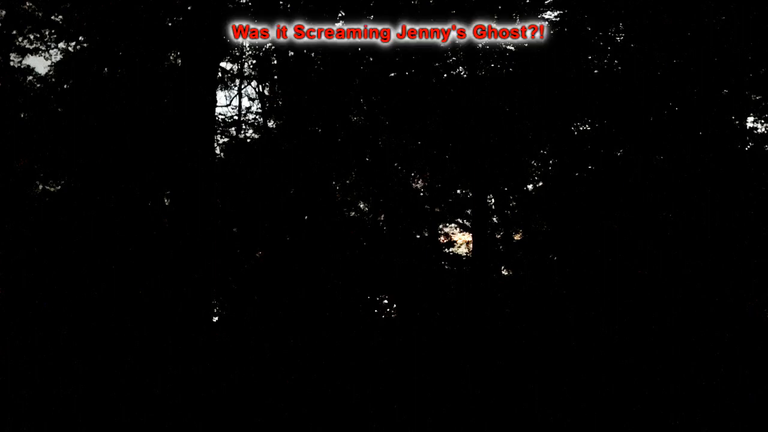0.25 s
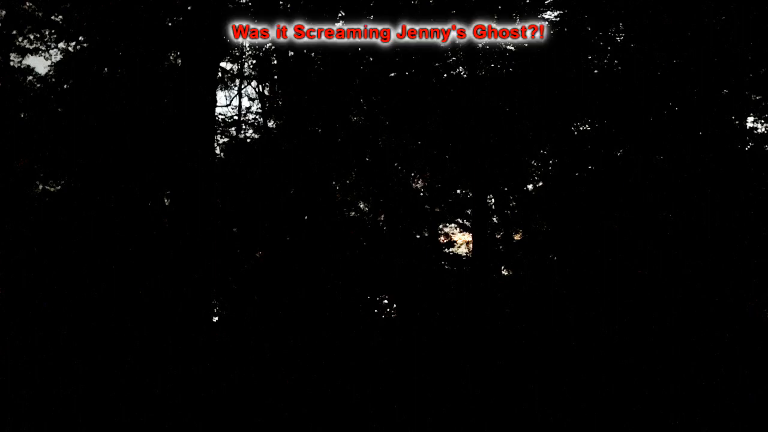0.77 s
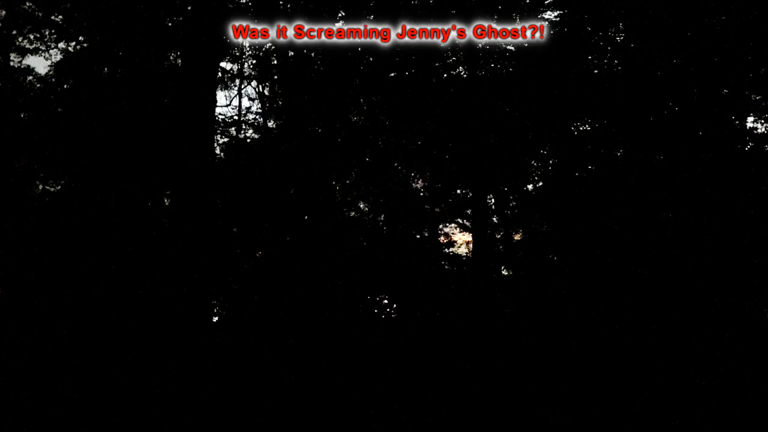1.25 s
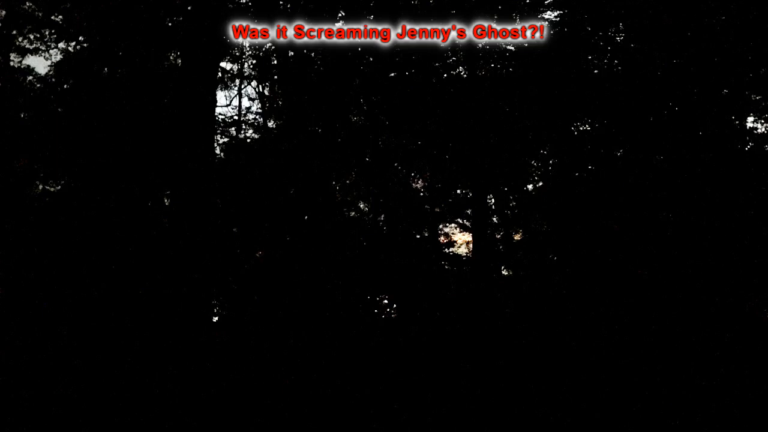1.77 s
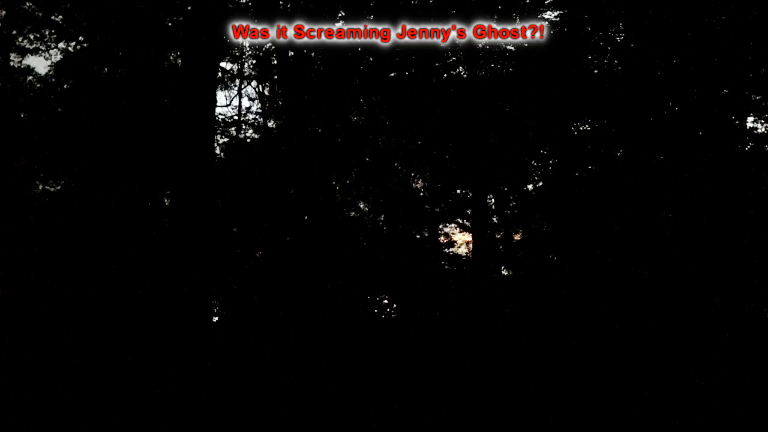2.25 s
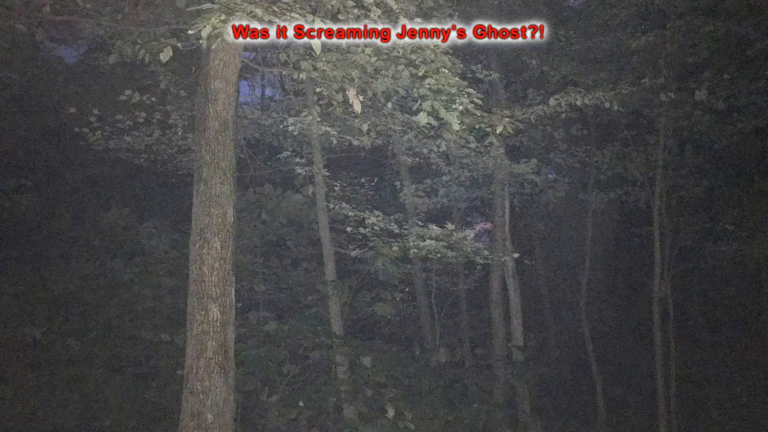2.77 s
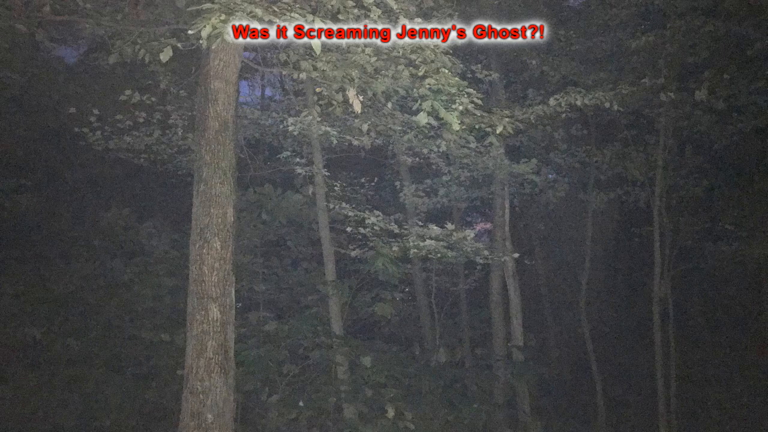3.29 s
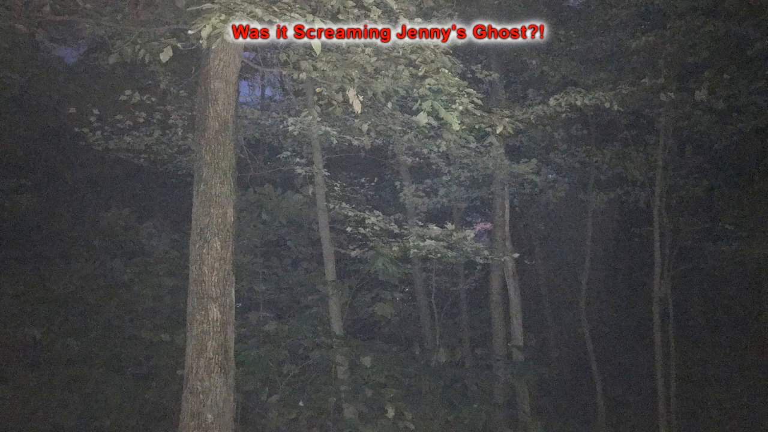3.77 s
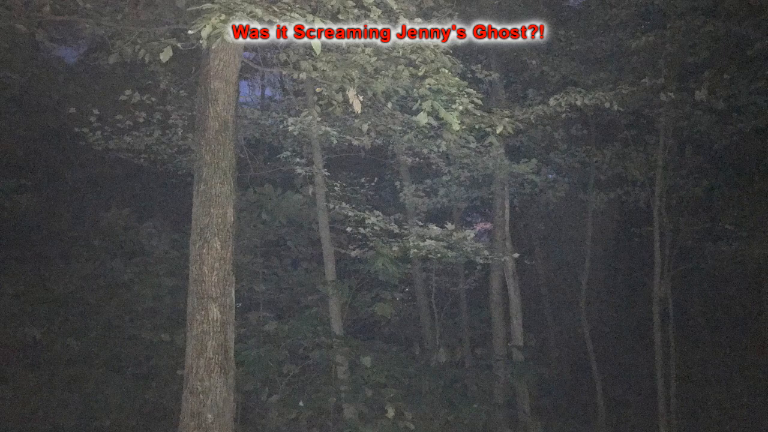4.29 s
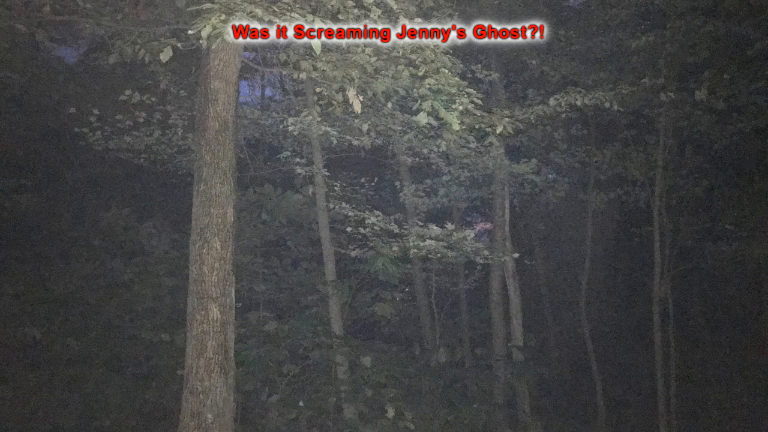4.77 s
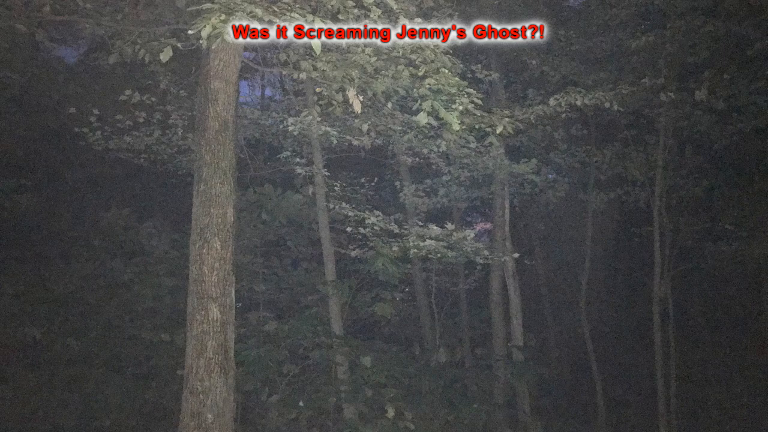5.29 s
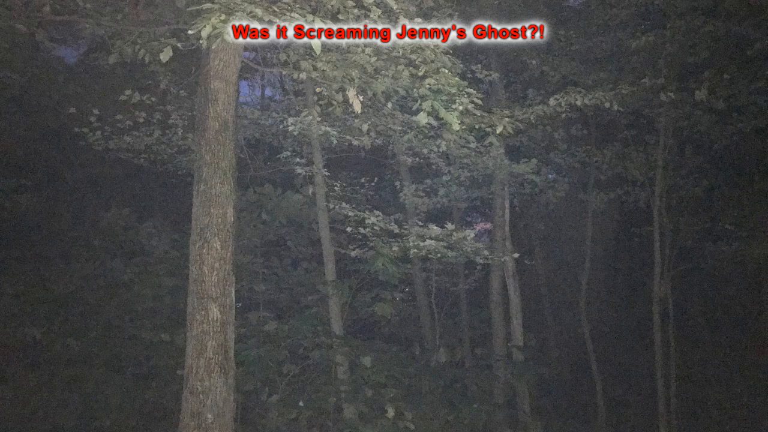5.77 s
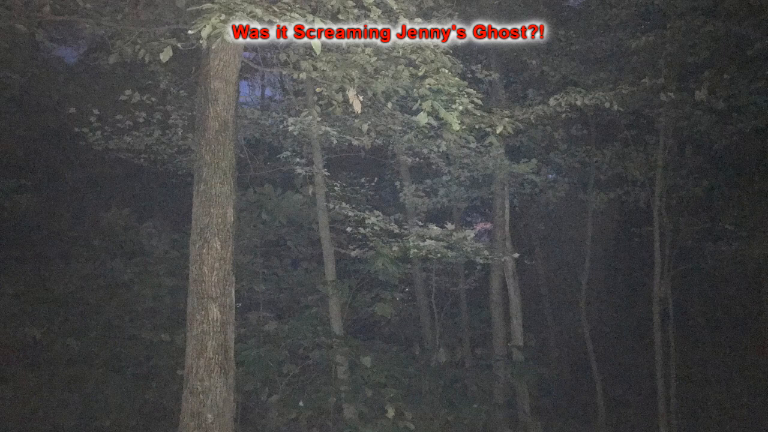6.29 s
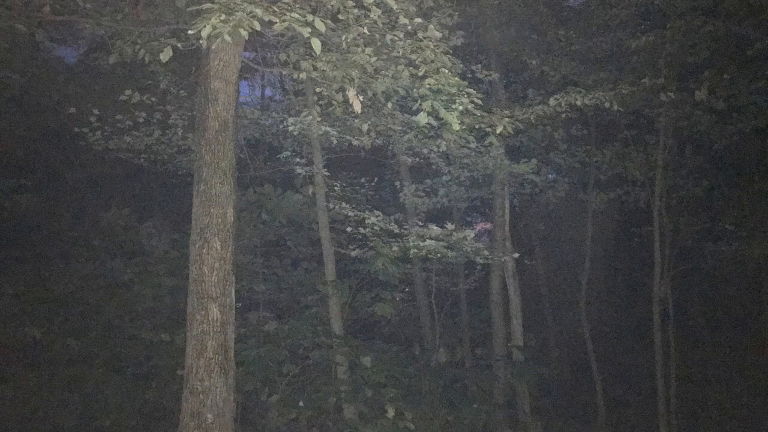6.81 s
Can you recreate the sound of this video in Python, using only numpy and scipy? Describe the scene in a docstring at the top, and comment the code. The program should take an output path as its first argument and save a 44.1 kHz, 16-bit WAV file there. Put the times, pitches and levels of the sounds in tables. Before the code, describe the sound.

Crickets trill steadily throughout in a wood at night, with a high sizzle and occasional hoarse chirrs from farther insects. Beneath them lie a soft hiss of air and a low, distant rumble that swells gently three times. Right at the start a screech owl whinnies for about a second: a nearly pure whistle that slides up, grows louder, quavers and sinks, echoing among the trunks. At about 1.7 seconds something small snaps sharply close by. Two nearer crickets fade out by around 3 to 3.5 seconds. The owl calls again from 3.2 to 4.4 seconds, swelling as it falls with a gentler quaver. From 5.5 to 6.2 seconds a katydid makes five quick, dry, high rasps while the chorus briefly surges. At 6.6 seconds a third, softer owl call begins, cracking into a higher second tone near the end at about 7 seconds.

```python
"""A screech owl whinnies three times in a wood at night: its voice box makes a nearly pure whistle
that rises, quavers and sinks, then rings on among the trunks. Crickets trill all round by rubbing
their wings together, a katydid (a large bush cricket) rasps five times the same way, and something
small snaps close by. Under it all lie a soft hiss of air and a low, distant rumble."""
import sys
import numpy as np
from scipy import signal
from scipy.fft import rfft, irfft, next_fast_len
from scipy.io import wavfile

SR = 44100
rng = np.random.default_rng(int(sys.argv[2]) if len(sys.argv) > 2 else 0)


def master(y):
    """Save y as 16-bit WAV."""
    cut = np.clip(np.atleast_2d(y).T, -1, 1)
    pcm = np.round(cut * 32767)  # scale
    wavfile.write(sys.argv[1], SR, pcm.astype(np.int16))


N = 310905
T = np.arange(N) / SR  # the time of each sample, in seconds


def undb(db):
    """Turn decibels (dB) into a number to multiply a sound by."""
    return 10 ** (np.asarray(db) / 20)


def unit(x):
    """Scale a signal so that its average strength (rms) is 1."""
    return x / np.sqrt(np.mean(x ** 2))


def gate(start, end, edge):
    """Fade in after start and out before end; each fade lasts edge seconds."""
    return np.clip((T - start) / edge, 0, 1) * np.clip((end - T) / edge, 0, 1)


def bump(middle, half):
    """A smooth rise to 1 and back, strongest within half seconds of the middle."""
    return np.exp(-((T - middle) / half) ** 2)


def wobble(rate):
    """A smooth random wobble, about 1 in size, that changes about rate times a second."""
    hz = np.arange(N // 2 + 1) * SR / N
    keep_slow = np.exp(-(hz / rate) ** 2) * (hz > 0)
    return unit(irfft(rfft(rng.standard_normal(N)) * keep_slow, N))


def colour(x, points):
    """Turn frequencies up or down by rows of (Hz, dB), then scale the sound to strength 1."""
    hz, db = np.transpose(points)
    size = next_fast_len(N)
    bins = np.maximum(np.arange(size // 2 + 1) * SR / size, 1)
    gain = undb(np.interp(np.log(bins), np.log(hz), db))
    return unit(irfft(rfft(x, size) * gain, size)[:N])


def trees(x, fade_s, build_s):
    """Countless echoes off trunks and leaves build up, then die away by 60 dB in fade_s seconds."""
    t = T[:2 * SR]
    echoes = rng.standard_normal(len(t)) * undb(-60 * t / fade_s) * (1 - np.exp(-t / build_s))
    return signal.fftconvolve(x, echoes / np.sqrt(np.sum(echoes ** 2)))[:N]


def night_air(level_db=-37):
    """Still air: a soft, steady hiss, strongest in the bass."""
    # Each row: frequency in Hz, relative level in dB.
    air_colour = [(15, -4), (30, -3.5), (100, -1), (160, -7.5), (270, -11), (450, -18), (620, -17.5),
                  (800, -20.5), (980, -20.5), (1500, -26.5), (4000, -29), (12000, -42.5)]
    return colour(rng.standard_normal(N), air_colour) * undb(level_db)


def distant_rumble(boom_db=-32.5, hum_hz=65.95, hum_db=-32.5, hum_fade_db_per_s=0.6):
    """A deep noise swells three times, with a wavering hum in it that slowly fades."""
    # Each row: frequency in Hz, relative level in dB.
    boom_colour = [(18, -25), (30, -6), (45, 0), (63, 2.5), (80, -7), (105, -8), (160, -22), (400, -56),
                   (1000, -88)]
    # Each row: middle in seconds, half length in seconds, boost of the boom in dB, of the hum in dB.
    swells = [(.75, 0.46, 3, 3.5), (3.2, 0.68, 2, 6.5), (5.8, .28, 3, 4)]
    boom_swell_db, hum_swell_db = sum(np.outer(dbs, bump(middle, half)) for middle, half, *dbs in swells)
    boom = colour(rng.standard_normal(N), boom_colour) * undb(boom_db + boom_swell_db)
    hum_gain = undb(hum_db + hum_swell_db - hum_fade_db_per_s * T + 0.83 * wobble(12))
    hum = hum_gain * np.sin(2 * np.pi * np.cumsum(hum_hz + 2.475 * wobble(6.35)) / SR)
    return (boom + hum) * undb(0.5 * wobble(1.6))


def insect_wave(period_s=2.1, crest_s=0.31):
    """The slow swell and ebb that the chorus and the sizzle share, from -1 to 1."""
    return np.cos(2 * np.pi * (T - crest_s) / period_s)


def far_insects(drone_db=-49, sizzle_db=-45.5, chirr_gap_s=0.24):
    """Far insects blend into a low drone, hoarse chirrs and the high sizzle of many bush crickets."""
    # In these three tables, each row: frequency in Hz, relative level in dB.
    drone_colour = [(1600, -26), (1900, -5), (2080, 0), (2250, -7.5), (2600, -14.5), (3000, -2),
                    (3300, -61)]
    chirr_colour = [(1600, -11.5), (1950, 5.5), (2100, 1), (2350, 2), (2600, 2), (2950, 4.5), (3300, -53)]
    sizzle_colour = [(3500, -25), (4700, -1.5), (5300, 5), (6050, -7.5), (6900, 3.5), (7600, -1), (8300, 2),
                     (9200, -9), (10000, 0), (10900, -4.5), (13500, -6.5)]
    # Each row: middle of the first chirr in seconds, half length in seconds, level in dB, chirr count.
    chirr_groups = [(0.098, 0.12, -44.5, 2), (2.35, .088, -46.5, 2), (3.5, .15, -51.5, 2),
                    (4.478, 0.092, -44.5, 2), (5.029, .16, -42.3, 1), (6.41, 0.083, -45.5, 2)]
    drone = colour(rng.standard_normal(N), drone_colour) * undb(drone_db + wobble(24))
    waves = sum(undb(db) * bump(first + k * chirr_gap_s, half)
                for first, half, db, count in chirr_groups for k in range(round(count)))
    chirr = colour(rng.standard_normal(N), chirr_colour) * waves * undb(wobble(40))
    sizzle = colour(rng.standard_normal(N), sizzle_colour)
    sizzle *= undb(sizzle_db + 0.7 * insect_wave() + 0.83 * wobble(45))
    return drone + chirr + sizzle


def bush_cricket():
    """One bush cricket makes a thin, very high buzz that comes and goes."""
    # Each row: frequency in Hz, relative level in dB.
    buzz_colour = [(8500, -40), (9700, -2), (10050, -7), (10400, -10), (12000, -40)]
    # Each row: start in seconds, end in seconds, level in dB.
    buzzes = [(0, 0.497, -59), (2.15, 2.75, -54.5), (4.1, 4.799, -58)]
    loudness = sum(undb(db) * gate(start, end, 0.11) for start, end, db in buzzes)
    return colour(rng.standard_normal(N), buzz_colour) * loudness


def cricket(hz, strokes_per_s, sag, wander, scatter, overlap):
    """Each wing stroke draws a row of tiny teeth over a scraper: a short tone that sags in pitch."""
    drift = np.interp(T, np.linspace(0, T[-1], num=16), rng.standard_normal(size=16))
    speed = strokes_per_s * (1 + wander * drift)
    number, progress = np.divmod(rng.random() + np.cumsum(speed) / SR, 1)
    # every stroke gets its own pitch and size; more overlap runs the strokes together
    detune, size = rng.standard_normal(size=(1024, 2))[number.astype(int)].T
    stroke = np.maximum(overlap - np.cos(2 * np.pi * progress), 0) * undb(2 * size)
    pitch = hz * (1 - sag * (progress - .5) + scatter * detune)
    return unit(stroke * np.sin(2 * np.pi * np.cumsum(pitch) / SR))


def cricket_chorus(count=28, level_db=-28, blur_db=-4, surge_db=1.8):
    """Many crickets, each at its own pitch and speed; the furthest blur into a hiss."""
    # Each row: frequency in Hz, relative level in dB.
    chorus_colour = [(1500, -85), (2750, -34), (3020, -18), (3200, -7), (3350, 1.5), (3530, -0.5),
                     (3720, -5), (3930, -12.5), (4150, -10.5), (4400, -17.5), (4700, -26), (6500, -92)]
    singers = sum(cricket(hz, rng.uniform(42, 62), sag=0.06, wander=.02, scatter=.007, overlap=0.34)
                  for hz in np.linspace(3050, 4400, count))
    blur = undb(blur_db) * colour(rng.standard_normal(N), chorus_colour)
    loudness = undb(level_db + 0.52 * insect_wave() + surge_db * bump(middle=5.7, half=0.25))
    return unit(colour(singers, chorus_colour) + blur) * loudness


def near_crickets(echo_db=-4):
    """Two nearby crickets stand out from the chorus, then stop."""
    # Each row: start in seconds, end in seconds, pitch in Hz, wing strokes per second, level in dB.
    trills = [(0.016, 3.5, 2005, 37.3, -52), (-0.18, 2.95, 4050, 45.2, -41)]
    direct = np.zeros(N)
    for start, end, hz, strokes_per_s, db in trills:
        trill = cricket(hz, strokes_per_s, sag=0.017, wander=0.007, scatter=0.01103, overlap=0.76)
        direct += undb(db) * gate(start, end, 0.49) * trill
    return direct + undb(echo_db) * trees(direct, fade_s=0.29, build_s=0.0072)


def katydid(start_s=5.544, count=5, period_s=0.1296, scrape_s=.122, level_db=-42.5, echo_db=-0.5):
    """Dry, evenly paced scrapes of the wings, one close behind another."""
    # Each row: frequency in Hz, relative level in dB.
    scrape_colour = [(5000, -40), (6000, -10), (6800, 1), (8000, 5.5), (10000, 3.5), (12000, -1.5),
                     (13800, -2), (15000, -22)]
    scrapes = sum(gate(at, at + scrape_s, 0.036) for at in start_s + period_s * np.arange(count))
    rasp = rng.standard_normal(N) * undb(0.5 * wobble(400))
    direct = undb(level_db) * scrapes * colour(rasp, scrape_colour)
    return direct + undb(echo_db) * trees(direct, fade_s=0.65, build_s=0.012)


def snap(crack_db=-15, crack_fade_s=0.019, echo_db=-18, bass_cut_hz=1450):
    """A small hard thing clicks and rebounds, ringing for a few thousandths of a second."""
    # Each row: start in seconds, relative level in dB, treble boost of the ring in dB per octave.
    clicks = [(1.689, -.4, -1.5), (1.695, -21.5, 8)]
    # Each row: pitch of a ringing tone in Hz, relative level in dB, seconds to fade by 60 dB.
    tones = [(1396, -44, 0.0086), (2580, -8, 0.0058), (3240, 2, 0.006), (4320, -12, 0.0085),
             (6960, -8.5, 0.0037), (8070, -1.5, 0.0027), (13300, -15, 0.0023)]
    direct = np.zeros(N)
    for start, size_db, tilt_db in clicks:
        age = np.maximum(T - start, 0)
        ring = sum(undb(db + tilt_db * np.log2(hz / 3300) - 60 * age / fade_s)
                   * np.sin(2 * np.pi * hz * age) for hz, db, fade_s in tones)
        crack = (age > 0) * undb(crack_db - 60 * age / crack_fade_s) * rng.standard_normal(N)
        direct += undb(size_db) * (ring + crack)
    # it is too small to give off bass
    bass_cut = signal.butter(4, bass_cut_hz, "high", fs=SR, output="sos")
    direct = signal.sosfilt(bass_cut, direct + 1e-18)
    return direct + undb(echo_db) * trees(direct, fade_s=0.48, build_s=0.0023)


def whinny(call, start_hz, rise_s=.16, quavers_per_s=12.5, late_quaver_hz=13, drop_hz=340):
    """Pitch and loudness of one owl call: it slides up, holds, falls with a quaver and drops away."""
    start, length, top, sag, fall_at, fall_s, low, quaver, db, swell_at, swell_db, half, fall_db = call
    age = np.clip(T - start, 0, length)
    high = np.minimum(start_hz + (top - start_hz) * age / rise_s, top - sag * (age - rise_s))
    fallen = .5 + .5 * np.tanh((T - fall_at) / (2 * fall_s))  # 0 before the fall, 1 after
    # the quaver is widest around the fall and lingers on the low note
    shaking = gate(fall_at - 3.6 * fall_s, fall_at + 1.6 * fall_s, fall_s)
    depth_hz = np.maximum(quaver * shaking, late_quaver_hz * fallen)
    shake_hz = depth_hz * np.cos(2 * np.pi * quavers_per_s * (T - fall_at - .014))
    hz = high + (low - high) * fallen + shake_hz - drop_hz * np.exp((age - length) / .017)
    level_db = db + swell_db * bump(swell_at, half) + fall_db * fallen
    level_db += 5 * bump(start + 0.11, 0.029)  # an accent near the top of the slide
    level_db += .055 * shake_hz  # louder on each crest of the quaver
    level_db -= 4.5 * np.exp(-((hz - 1090) / 35) ** 2)  # the whistle thins around one pitch
    fade_in = np.minimum(age / 0.052, 1)
    return hz, undb(level_db) * fade_in * gate(start, start + length, 0.016)


def whinnies(start_hz=1005, dip_db=-11, dip_half_s=.011):
    """Pitch and loudness of all three calls, each sliding up from the same note."""
    # Each row: start and length in seconds, top pitch in Hz, sag in Hz per second, middle and time
    # scale of the fall in seconds, low pitch in Hz, quaver depth in Hz, base level in dB, middle of
    # the swell in seconds, its boost in dB, its half length in seconds, change over the fall in dB.
    calls = [(.02, 1.157, 1245, 135, .868, .03, 1004, 72, -29.6, .67, 12.3, .13, -2.3),
             (3.226, 1.205, 1290, 20, 3.95, .1, 1005, 29, -33.3, 4.03, 10.7, .3, .5),
             (6.641, 1.15, 1254, 20, 6.92, .02, 1200, 25, -34.8, 6.94, 1.5, 0.045, -3)]
    # Each entry: a moment in seconds when the held whistle dips briefly in level.
    dips = [.285, 3.525, 3.585, 3.725]
    hz, loudness = start_hz, 0
    for call in calls:
        call_hz, call_loudness = whinny(call, start_hz)
        hz = np.where(T >= call[0], call_hz, hz)
        loudness = loudness + call_loudness
    return hz, loudness * undb(dip_db * sum(bump(at, dip_half_s) for at in dips))


def voice_crack(voice_phase, level_db=-38.8):
    """The owl's last call cracks: a second tone splits off upwards."""
    # Each row: time in seconds, pitch of the second tone in Hz.
    path = [(6.9, 1260), (6.94, 1480), (7.07, 1460)]
    hz = np.interp(T, *np.transpose(path)) * (1 + 0.013 * wobble(150))
    phase = 2 * np.pi * np.cumsum(hz) / SR
    # the vibrations alternate, which adds a tone halfway between the two
    halfway = 1.05 * np.sin((phase + voice_phase) / 2)
    return undb(level_db) * gate(path[0][0], path[-1][0], 0.017) * (np.sin(phase) + halfway)


def owl(jitter=0.005, flutter_db=1.5, octave_db=-20, throat_hz=2030, fade_hz=935):
    """The owl's voice box whistles, with a weak tone an octave above, and the wood echoes it."""
    hz, loudness = whinnies()
    hz = hz * (1 + jitter * wobble(76))
    phase = 2 * np.pi * np.cumsum(hz) / SR
    loudness *= undb(1.5 + flutter_db * wobble(25))
    loudness /= 1 + (fade_hz / hz) ** 16  # the voice gives out as the pitch drops away
    # the octave only gets through the throat when the pitch is low
    octave = undb(octave_db) / (1 + ((2 * hz - throat_hz) / 130) ** 2)
    voice = loudness * (np.sin(phase) + octave * np.sin(2 * phase)) + voice_crack(phase)
    near_echoes = undb(-15) * trees(voice, fade_s=0.11, build_s=0.0057)
    # low notes carry furthest among the trunks: 10 dB more for each octave down
    carried = voice * undb(-8.5 - 10 * np.log2(hz / 1100))
    return voice + near_echoes + trees(carried, fade_s=1.85, build_s=0.012)


def scene():
    """The wood at night, on one channel."""
    mix = owl() + cricket_chorus() + near_crickets() + far_insects() + bush_cricket() + katydid()
    return (mix + snap() + night_air() + distant_rumble())[None]


def record(dry, top_hz=15950):
    """Clip the sound at full scale and cut the very highest treble."""
    treble_cut = signal.ellip(10, .2, 80, top_hz, fs=SR, output="sos")
    return signal.sosfilt(treble_cut, np.clip(dry, -1, 1))


dry = scene()
out = record(dry)
master(out)
```